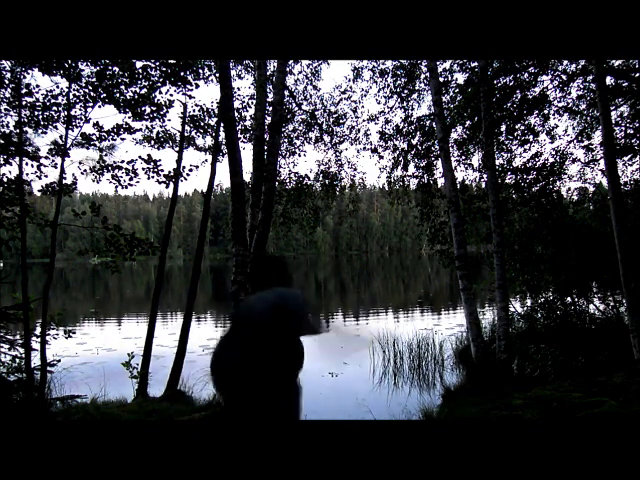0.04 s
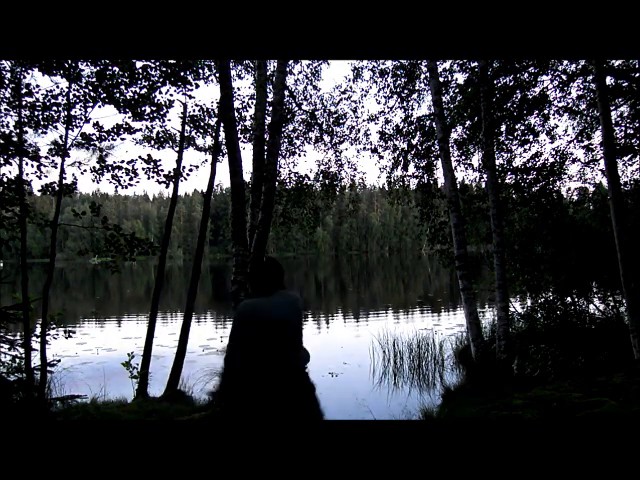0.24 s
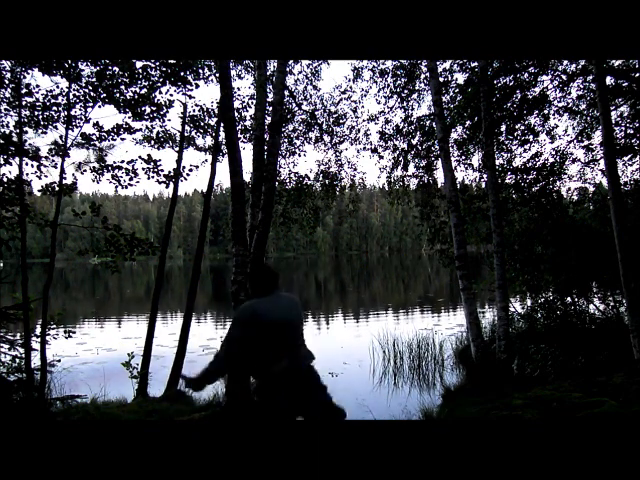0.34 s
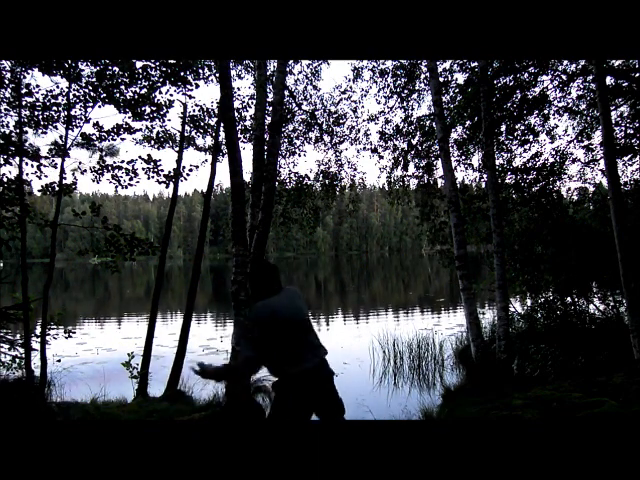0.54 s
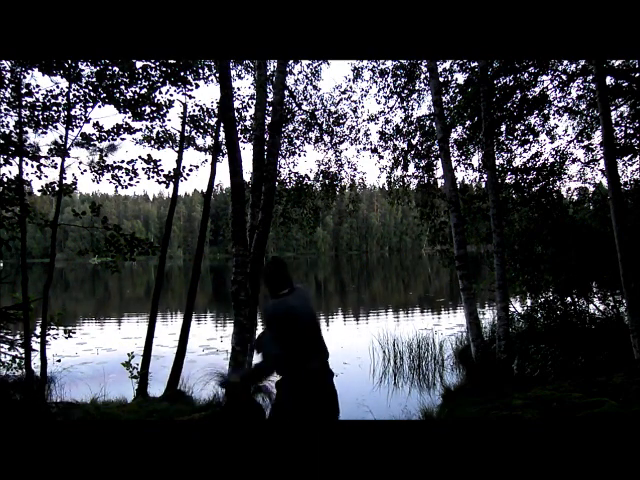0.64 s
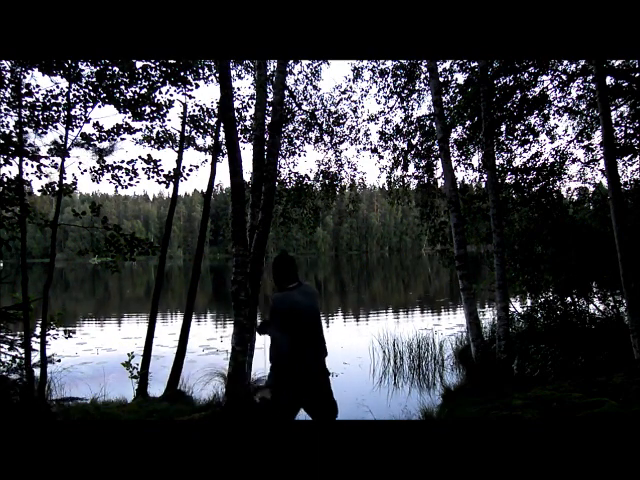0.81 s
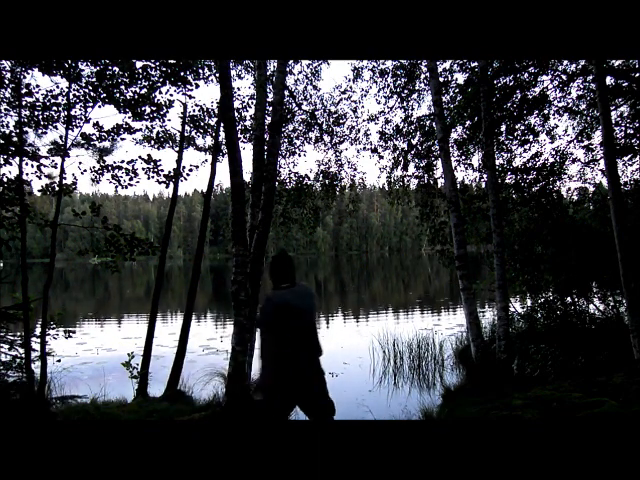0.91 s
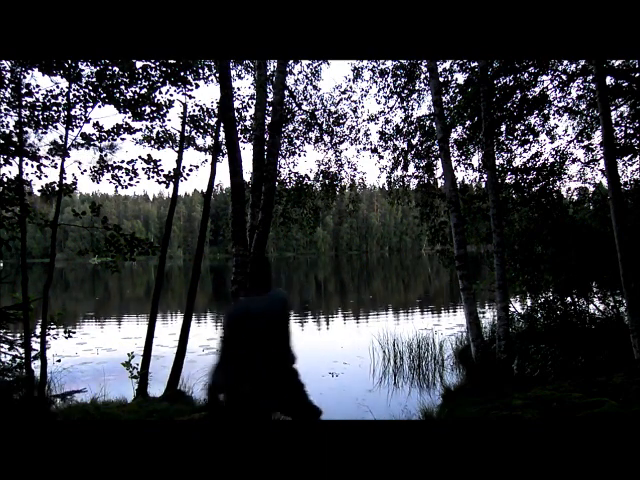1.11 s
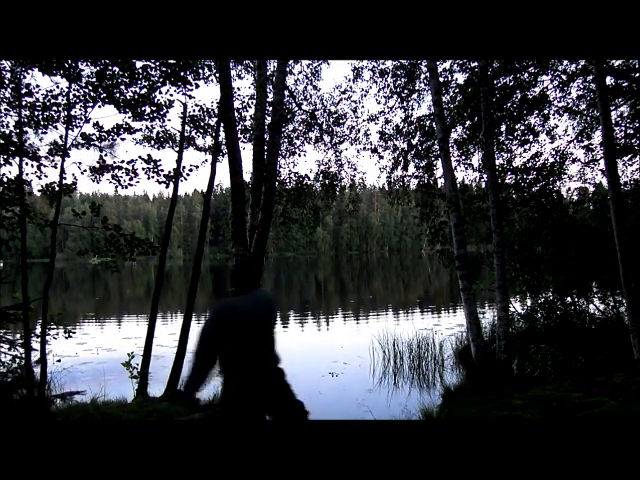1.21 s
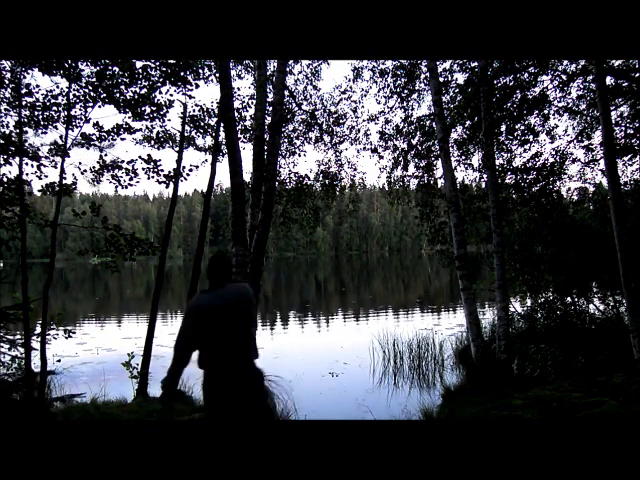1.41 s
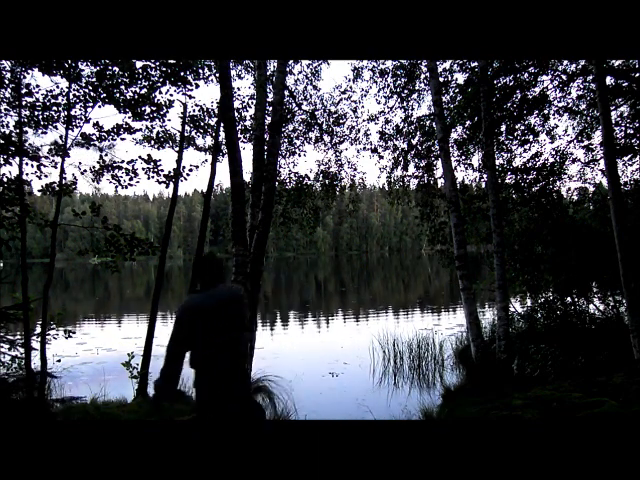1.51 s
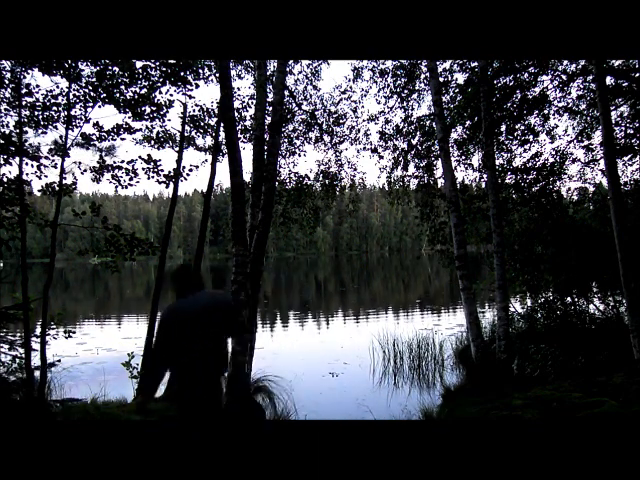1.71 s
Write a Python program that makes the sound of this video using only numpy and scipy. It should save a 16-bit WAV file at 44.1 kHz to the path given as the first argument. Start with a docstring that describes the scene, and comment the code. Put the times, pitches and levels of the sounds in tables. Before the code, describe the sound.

A sling's rising whoosh ends in a sharp whip-like crack, picked up by one microphone near the thrower's rustling clothes. A bright echo fades through the lakeside trees, then a dull knock and light taps sound in quiet air.

```python
"""A wooded lake shore, quiet outdoor air, one microphone on someone throwing a sling. Clothes rustle,
the cord sheds eddies in a rising whoosh as it speeds up, and its loose end cracks like a whip.
Near trunks, foliage and the far shore scatter the crack back as a bright, fading hiss.
A dull knock and a few faint taps follow."""
import sys
import numpy as np
from scipy import signal
from scipy.fft import rfft, irfft
from scipy.io import wavfile
from scipy.ndimage import map_coordinates

SR = 44100
rng = np.random.default_rng(int(sys.argv[2]) if len(sys.argv) > 2 else 0)


def unload_wav(signal):
    """Save mono or channel-first audio to the path in sys.argv[1] as 16-bit WAV at rate SR, clipped to [-1, 1]."""
    wavfile.write(
        sys.argv[1],
        SR,
        np.round(np.clip(np.atleast_2d(signal).T, -1, 1) * 32767).astype(np.int16),
    )


N = 77175
T = np.arange(N) / SR
BINS_HZ = np.arange(N // 2 + 1) * SR / N + 1   # 1 Hz up, to keep logarithms finite


def from_db(db):
    """Decibels to gain."""
    return 10 ** (np.asarray(db) / 20)


def unit_power(x):
    """Scale to an RMS of one."""
    return x / np.sqrt(np.mean(np.abs(x) ** 2) + 1e-20)


def colour_db(colour):
    """A spectrum's level at every frequency bin."""
    hz, db = np.transpose(colour)
    return np.interp(np.log(BINS_HZ), np.log(hz), db)


def noise(colour):
    """Noise of a given colour, unit power."""
    return unit_power(irfft(rfft(rng.standard_normal(N)) * from_db(colour_db(colour)), N))


def wander(steps):
    """A smooth random value that changes once per step."""
    return unit_power(map_coordinates(rng.standard_normal(N), [steps + 5], order=3, mode="wrap"))


def bell(offset, half_width):
    """A Gaussian curve, one at its centre."""
    return np.exp(-.5 * (offset / half_width) ** 2)


def swells(rows):
    """A level that rises and falls smoothly around each row's moment."""
    return sum(from_db(db) * bell(T - centre, half_width) for centre, db, half_width in rows)


def cut_bass(x, order, hz=269):
    """Roll off the low end."""
    return signal.sosfilt(signal.butter(order, hz, "high", fs=SR, output="sos"), x + 1e-18)


def echoes(x, t60):
    """Diffuse reflections from trunks and ground, 60 dB down after t60 seconds."""
    response = rng.standard_normal(N) * from_db(-60 * T / t60) * (T > .005)
    return signal.fftconvolve(x, response / np.sqrt(np.sum(response ** 2)))[:N]


def causal_filter(x, db):
    """Filter by a spectrum so that nothing sounds early; white noise keeps its power."""
    cepstrum = irfft(np.log(unit_power(from_db(db))), N)
    cepstrum[1:N // 2] *= 2
    cepstrum[N // 2:] = 0
    return irfft(rfft(x) * np.exp(rfft(cepstrum)), N)


def bursts(rows, body, width_octaves):
    """Sudden, quickly dying noise bursts, each with one broad resonance of its own."""
    out = np.zeros(N)
    for start, db, hz, boost_db, t60 in rows:
        envelope = (T >= start) * from_db(db - 60 * np.maximum(T - start, 0) / t60)
        resonance_db = boost_db * bell(np.log2(BINS_HZ / hz), width_octaves)
        out += causal_filter(rng.choice([-1, 1], N) * envelope, colour_db(body) + resonance_db)
    return out


# The open shore around the microphone. Each row: frequency in Hz, relative level in dB.
AIR_COLOUR = [(15, -61), (25, -32.5), (145, -17.5), (217, -5.5), (326, -3.5), (394, 0.5), (677, -2),
              (863, 0), (1230, -4), (1560, -9), (1700, -10.5), (3720, -15.5), (11300, -18.5), (16000, -22)]

def air(level_db=-44):
    """Outdoor air: a steady hush, strongest in the low mids."""
    return from_db(level_db) * noise(AIR_COLOUR)


# Clothes and feet at the throwing spot. Each row: time in seconds, level in dB.
RUSTLE_LEVELS = [(0, -48), (.03, -55), (.036, -29.5), (.052, -35), (.058, -28.5), (.068, -21.5),
                 (.081, -27.5), (.095, -33), (.108, -33.5), (.145, -32.5), (.2, -27), (.33, -24.5),
                 (.4, -28), (.5, -36.5), (.68, -41), (.74, -41.5), (.8, -41), (.92, -41), (.975, -43),
                 (1.02, -52), (1.23, -51.5), (1.33, -39.5), (1.39, -45.5), (1.44, -46.5), (1.52, -52.5),
                 (1.75, -52)]
# Bright rubs of cord and sleeve. Each row: centre in seconds, level in dB, half width in seconds.
RUBS = [(.038, -32, .003), (.056, -21, 0.0011), (.078, -25, 0.009), (.125, -32.5, 0.015),
        (.202, -31, 0.011), (.738, -40, 0.011), (.7603, -35.5, .002)]
# Spectra of the rustle and the rubs. Each row: frequency in Hz, relative level in dB.
RUSTLE_COLOUR = [(50, -32), (200, -17), (450, -6.5), (1000, -2.5), (2200, -2.5), (4500, -1), (8500, -4),
                 (11500, -11.5), (16000, -20)]
RUB_COLOUR = [(100, -45), (2000, -26), (4500, -6), (8500, 4.5), (13000, -0.5), (16000, -3)]

def rustle(roughness_db=2, grain_hz=345.2):
    """Grainy friction of cloth and ground litter as the thrower turns, with a few brighter rubs."""
    grain = unit_power(from_db(roughness_db * wander(T * grain_hz)))
    cloth = noise(RUSTLE_COLOUR) * from_db(np.interp(T, *np.transpose(RUSTLE_LEVELS)))
    rubs = noise(RUB_COLOUR) * swells(RUBS)
    return grain * (cloth + rubs)


# Small taps, faint at the microphone. Each row: start in seconds, level in dB, resonance in Hz,
# its boost in dB, seconds to fall 60 dB.
TAPS = [(.0362, -26, 5440, 12, 0.021), (.6875, -28, 4500, 13, .02), (.697, -29.5, 2810, 4, 0.053),
        (.7585, -23.5, 4400, 11, 0.012), (.915, -35, 5140, 19, 0.017), (1.209, -35, 1150, 15.5, 0.026),
        (1.3362, -24, 2520, 7.5, 0.017), (1.3487, -21.5, 7660, 10, 0.0053), (1.3705, -28, 7000, 3, 0.0083),
        (1.482, -18.5, 4860, 7.5, 0.0031), (1.609, -41, 1800, 6, 0.031)]
# The spectrum they share. Each row: frequency in Hz, relative level in dB.
TAP_BODY = [(60, -42), (300, 4), (1000, -2.5), (2800, -1), (5500, -5), (8500, -0.5), (11000, -11),
            (16000, -14)]

def taps():
    """Light taps and ticks, one before the swing and the rest after the throw."""
    return bursts(TAPS, TAP_BODY, width_octaves=.27)


# Snaps from the sling itself. Each row: start in seconds, level in dB, resonance in Hz,
# its boost in dB, seconds to fall 60 dB.
SNAPS = [(.0581, -6, 6860, 11.5, 0.0038), (.0627, -13, 5570, 4, 0.019), (.0808, -9.5, 7450, 12, .003),
         (.105, -21.5, 8300, 15, 0.016), (.159, -17.5, 8500, 10, 0.0048), (.4158, -6, 3000, 16.5, 0.011),
         (.4177, -17.5, 11000, 19, .006), (.4193, -5, 6100, 14, 0.0066), (.4226, -7, 6100, 18, 0.0072),
         (.4256, -10.5, 5700, 8.5, 0.015), (.4609, -9.5, 5500, 7, 0.0047), (.4643, -12.5, 4030, 5, 0.014)]
# The spectrum they share. Each row: frequency in Hz, relative level in dB.
SNAP_BODY = [(60, -50), (220, -24), (450, 0), (1200, 1.5), (3000, -3), (9000, -2.5), (16000, -11.5)]

def snaps():
    """The sling snaps sharply as the swing begins and again around the crack."""
    return bursts(SNAPS, SNAP_BODY, width_octaves=.38)


# The swing as the microphone hears it. Each row: time in seconds, eddy pitch in Hz, level in dB,
# bandwidth as a share of the pitch.
SWING = [(.118, 897.6, -48, .12), (0.133, 906, -30, 0.11), (.178, 950.4, -29.5, 0.13),
         (.2, 1086, -16.5, 0.12), (.25, 1550, -13, .14), (.28, 2000, -14, .11), (.315, 2250, -17, .14),
         (.327, 2090, -23.5, .25), (.335, 2515, -14, 0.16), (.353, 2674, -9.5, 0.22),
         (.365, 2462, -21.5, .3), (0.383, 2352, -19, .4), (0.411, 2217, -26, 0.41), (0.471, 1100, -46, .2),
         (0.504, 853, -39, .06), (.53, 825, -41.5, 0.091), (.56, 780, -63, .08)]
# Slower inner cord, pouch and drag tone. Each row: multiple of the pitch, level in dB,
# relative bandwidth, growth in dB per octave of pitch.
CORD_TONES = [(.76, -11.5, 1.3, 0), (1.02, -2.5, 1.0, -1.1), (2.0, -17.5, 1.8, 8)]

def cord(mid_swing_hz=1810, evenness=.25, echo_db=-22):
    """The cord's eddies sing a tone that rises with speed, frays at release and sinks as it slows."""
    times, hz, db, spread = np.transpose(SWING)
    pitch = np.interp(T, times, hz)
    cycles = np.cumsum(pitch) / SR
    eddy_lives = 2 * np.cumsum(pitch * np.interp(T, times, spread)) / SR
    out = np.zeros(N)
    for multiple, tone_db, width, growth_db in CORD_TONES:
        steps = eddy_lives * multiple * width
        eddies = wander(steps) + 1j * wander(steps)   # random strength and phase
        eddies /= (np.abs(eddies) + .1) ** evenness   # steadies the strength a little
        tone = unit_power(np.real(eddies * np.exp(2j * np.pi * multiple * cycles)))
        out += from_db(tone_db + growth_db * np.log2(pitch / mid_swing_hz)) * tone
    out *= from_db(np.interp(T, times, db, left=-120, right=-120))
    return out + from_db(echo_db) * echoes(out, t60=.55)


# Moved air around the thrower. Each row: centre in seconds, level in dB, half width in seconds.
PUFFS = [(0.253, -33.5, 0.028), (.320, -22.5, .008), (0.333, -36, 0.014), (0.427, -34, 0.0067),
         (1.606, -38.5, 0.0049)]
# Its spectrum. Each row: frequency in Hz, relative level in dB.
PUFF_COLOUR = [(40, -50), (130, -26), (300, -8.5), (460, -1.5), (700, -10), (2000, -5), (8000, -49)]

def puffs():
    """Arm and pouch push the air aside in short, low swells."""
    return noise(PUFF_COLOUR) * swells(PUFFS)


# The pouch whipping past at release. Each row: centre in seconds, level in dB, pitch in Hz.
FLICKS = [(0.3463, -2, 2490), (0.3497, -.5, 2860)]

def flicks(half_width_s=.0005):
    """The opening pouch sheds short, strong packets of eddies."""
    return sum(from_db(db) * bell(T - centre, half_width_s) * np.sin(2 * np.pi * hz * (T - centre))
               for centre, db, hz in FLICKS)


# The crack reaching the microphone, direct and then in its first returns.
# Each row: start in seconds, level in dB, length in seconds.
SHOCKS = [(.4157, -1.5, 0.00033), (0.4179, -13, .00028), (0.4632, -6.5, .00025)]

def crack():
    """The cord's tip outruns sound: pressure jumps, slides straight through zero and jumps back."""
    out = np.zeros(N)
    for start, db, length in SHOCKS:
        progress = (T - start) / length
        out += from_db(db) * (2 * progress - 1) * ((progress >= 0) & (progress < 1))
    return cut_bass(out, order=2)


# Returns from near trunks, foliage and the far shore, nearest first. Each row: delay after the crack
# in seconds, level in dB, rise in seconds, seconds to fall 60 dB.
TREE_RETURNS = [(.001, -12.5, .002, .16), (.046, -18.5, .025, 0.33), (.09, -18.5, 0.031, 0.39),
                (.3, -39.5, 0.15, 0.85)]
# Spectra off trunks and off leaves. Each row: frequency in Hz, relative level in dB.
TRUNK_COLOUR = [(60, -22), (200, -17), (500, -31), (1200, 6), (2500, -14), (4200, 7.5), (6500, 5),
                (9500, 3), (12500, 1.5), (16000, -22)]
LEAF_COLOUR = [(60, -24), (200, -26), (500, -23), (900, -13), (2000, -6), (4200, 2.5), (6800, 7.5),
               (9500, 6), (12500, -2.5), (16000, -11)]

def trees(crack_s=.416):
    """The crack scatters back in swells: full from the near trunks, thinner from leaves farther off."""
    out = np.zeros(N)
    for k, (delay, db, rise, t60) in enumerate(TREE_RETURNS):
        age = T - crack_s - delay
        swell = bell(np.minimum(age, 0), rise) * from_db(db - 60 * np.maximum(age, 0) / t60)
        out += swell * noise(LEAF_COLOUR if k else TRUNK_COLOUR)
    return out * (T >= crack_s)


# A dull double knock as the trees' hiss fades. Each row: start in seconds, level in dB, pitch in Hz,
# seconds to fall 60 dB.
KNOCKS = [(.6875, -14.5, 604, 0.013), (0.6899, -12, 917, 0.0054)]

def knock(echo_db=-12.5):
    """Two heavily damped hollow pulses without bass, and their short echo."""
    out = np.zeros(N)
    for start, db, hz, t60 in KNOCKS:
        age = np.maximum(T - start, 0)
        out += from_db(db - 60 * age / t60) * np.sin(2 * np.pi * hz * age)
    out = cut_bass(out, order=3)
    return out + from_db(echo_db) * echoes(out, t60=.11)


def scene():
    """The shore, the throw and its echo, meeting at one microphone."""
    mono = air() + rustle() + taps() + snaps() + cord() + puffs() + flicks() + crack() + trees() + knock()
    return mono[None]


def record(dry, notch_hz=7870, cutoff_hz=15750):
    """The microphone chain: a narrow dip, clipped peaks and a steep top cut."""
    notched = signal.lfilter(*signal.iirnotch(notch_hz, Q=60, fs=SR), dry)
    top_cut = signal.ellip(12, .1, 75, cutoff_hz, fs=SR, output="sos")
    return signal.sosfilt(top_cut, np.clip(notched, -1, 1))


dry = scene()
out = record(dry)
unload_wav(out)
```